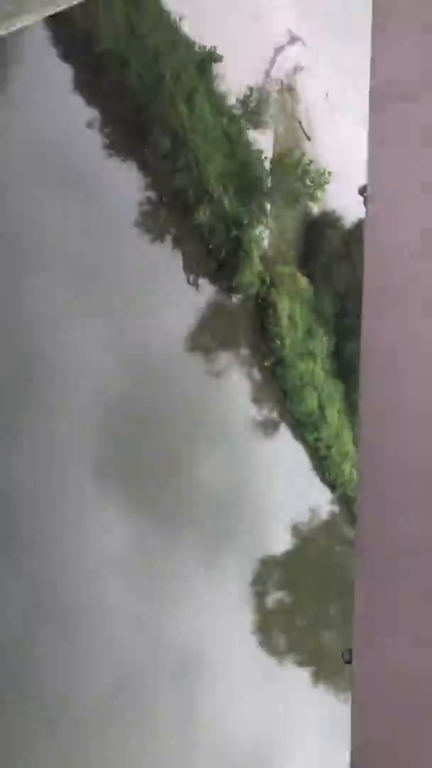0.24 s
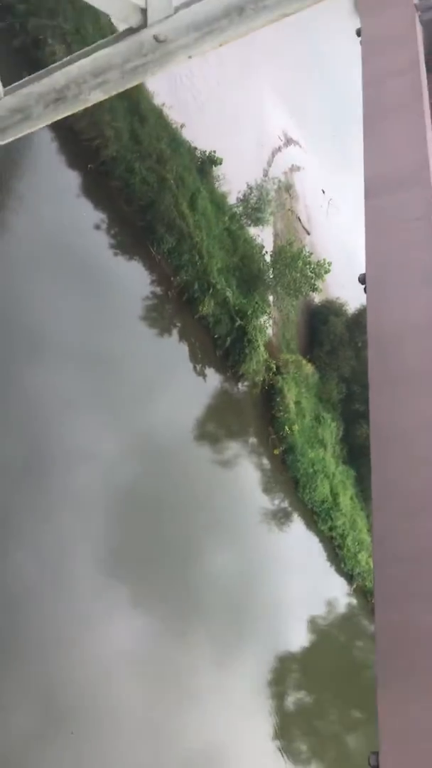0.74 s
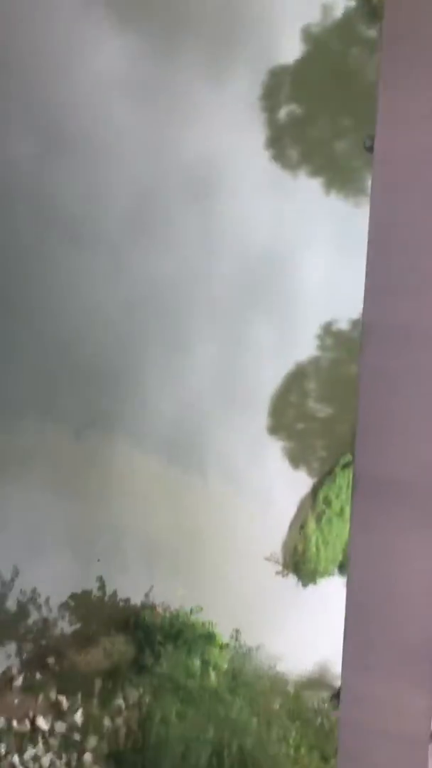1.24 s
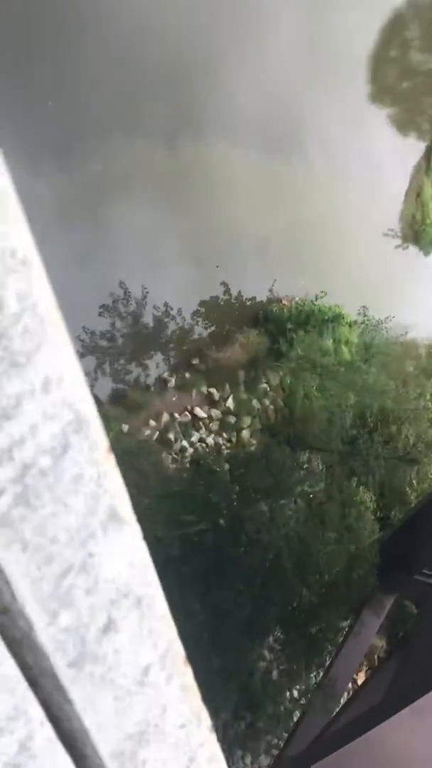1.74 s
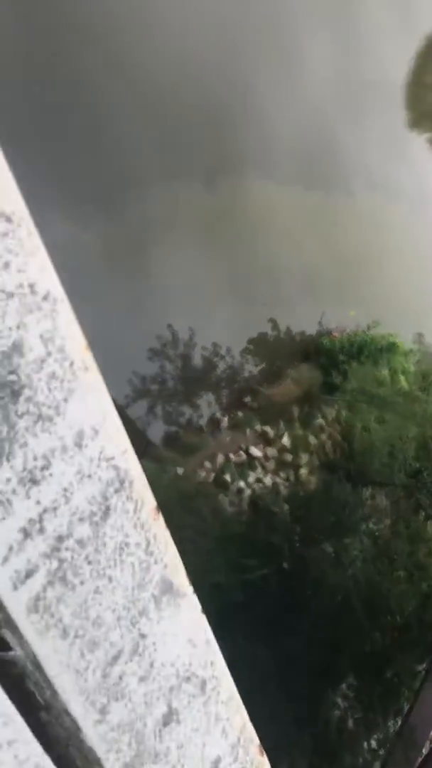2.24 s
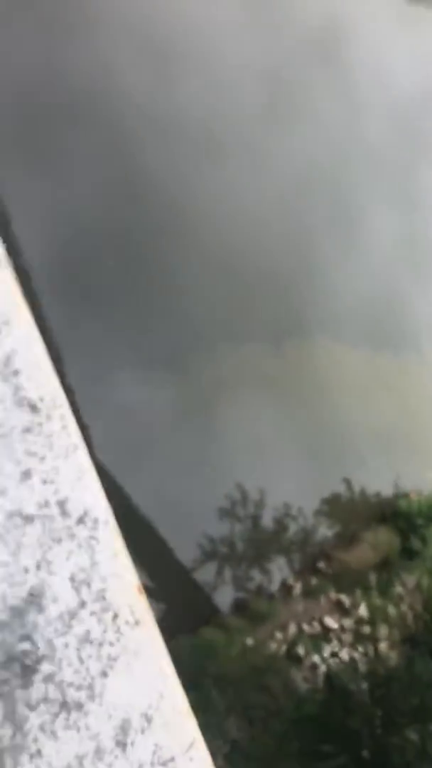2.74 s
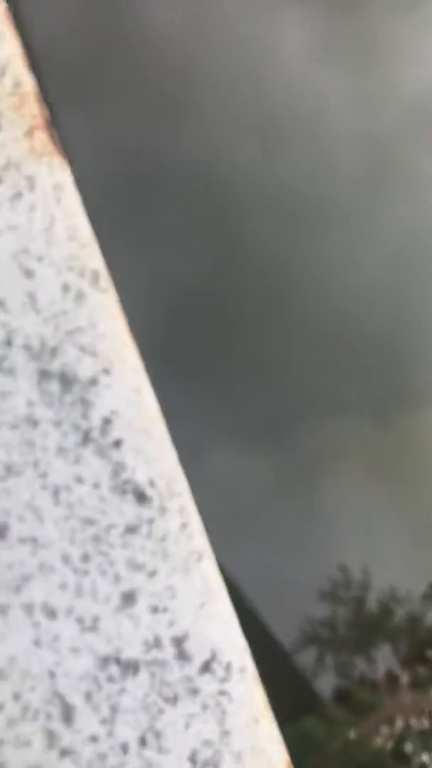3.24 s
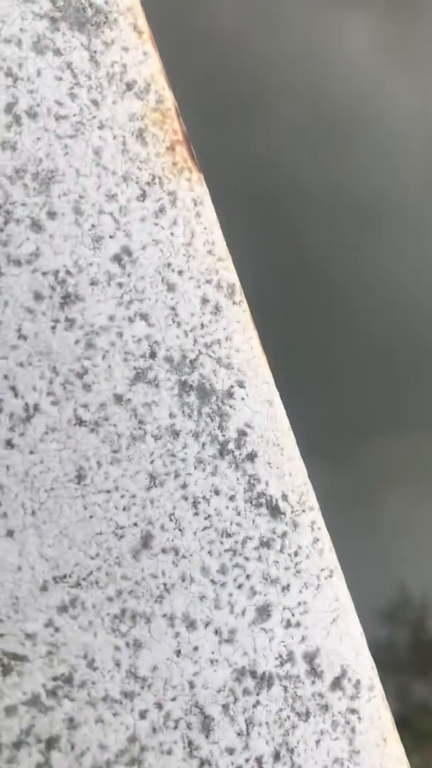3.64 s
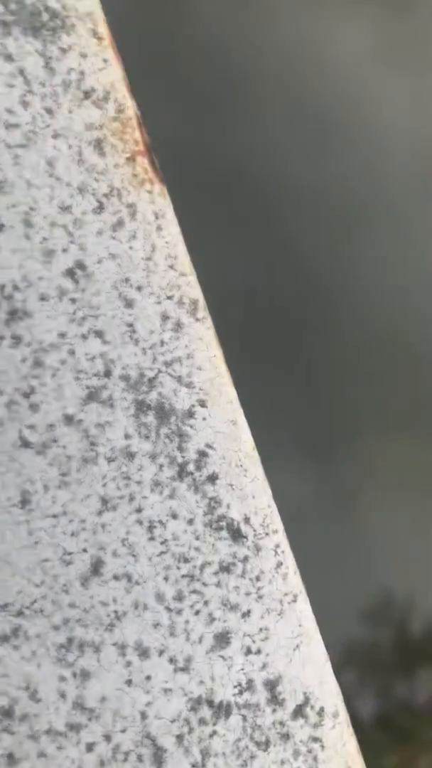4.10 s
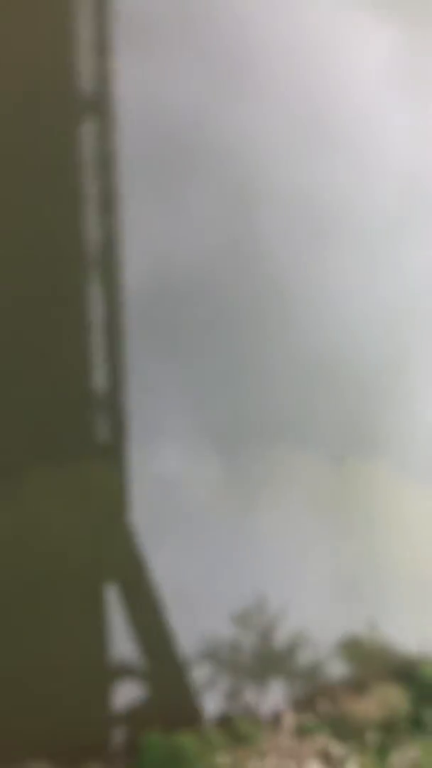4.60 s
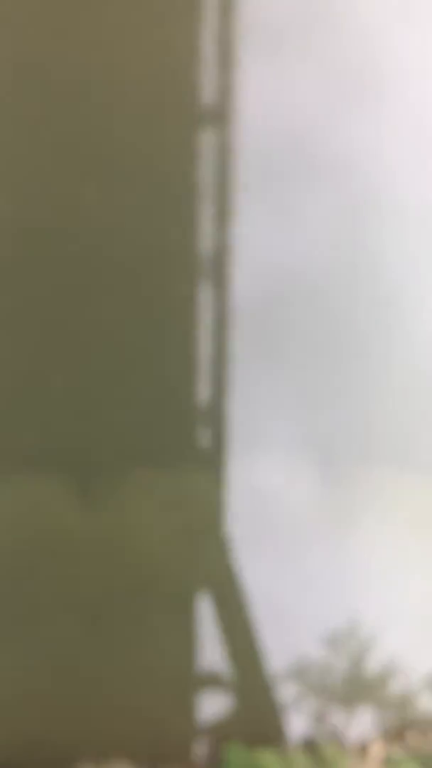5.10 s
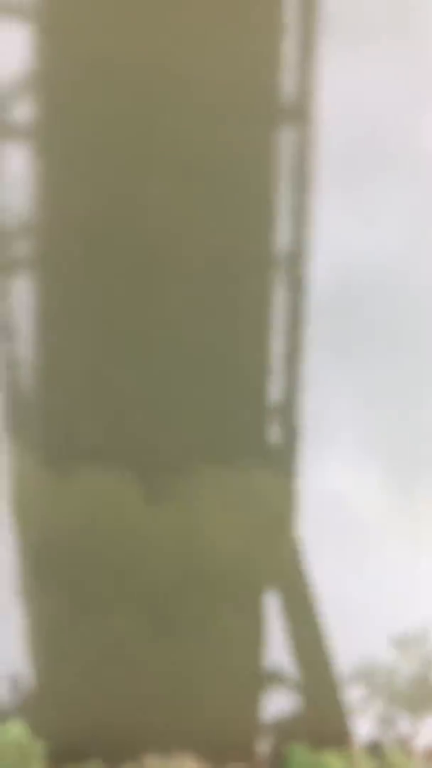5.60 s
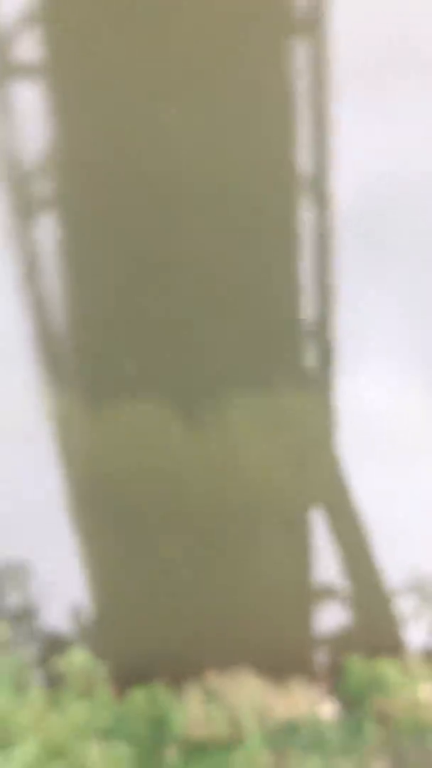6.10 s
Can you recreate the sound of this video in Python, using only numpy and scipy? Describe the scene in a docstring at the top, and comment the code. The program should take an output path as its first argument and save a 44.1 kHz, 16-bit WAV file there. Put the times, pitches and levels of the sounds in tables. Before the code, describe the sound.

Outdoors by a river, traffic on a bridge some way off makes a continuous, uneven tyre rush over a dull drone. One car's tyres sing, a fuzzy whine that slides lower as it passes around the middle. A hard little tick snaps near the microphone, the roar briefly swells, then traffic thins while soft handling bumps knock the device. Low wind rumble, faint hiss and rapid tiny ticking lie beneath.

```python
"""Cars cross a bridge over a river, heard outdoors from some way off.
From the start, coloured noise makes the tyre rush, low drone, wind rumble and hiss; faint ticks run along.
One car's tyres sing in fuzzy bands of noise that sink in pitch as it passes at about 3 s.
Just after, a sharp tick rings close by in fading tones; then the tyre roar swells briefly around 1.2 kHz.
Soft handling bumps, short pulses of a low tone, follow at about 4.4 and 5.3 s as the traffic thins."""
import sys
import numpy as np
from scipy import signal
from scipy.fft import irfft
from scipy.io import wavfile
from scipy.ndimage import uniform_filter1d

SR = 44100
rng = np.random.default_rng(int(sys.argv[2]) if len(sys.argv) > 2 else 0)


def unload_wav(signal):
    """Save mono or channel-first audio to the path in sys.argv[1] as 16-bit WAV at rate SR, clipped to [-1, 1]."""
    wavfile.write(
        sys.argv[1],
        SR,
        np.round(np.clip(np.atleast_2d(signal).T, -1, 1) * 32767).astype(np.int16),
    )


N = 280035  # length in samples, about 6.35 s
FRAME_S = np.arange(N // 256 + 9) * 256 / SR  # times at which the noise spectra may change
BIN_HZ = np.fft.rfftfreq(2048, 1 / SR)  # frequencies at which they are shaped


def from_db(db):
    """Turns decibels into a gain."""
    return 10 ** (np.asarray(db) / 20)


def unit(x):
    """Scales to rms 1."""
    return x / np.sqrt(np.mean(x ** 2) + 1e-20)


def curve(rows, axis=1):
    """Reads one column of a time table at every frame, with straight lines between rows."""
    rows = np.asarray(rows, float)
    return np.interp(FRAME_S, rows[:, 0], rows[:, axis])[:, None]


def colour(points):
    """Turns a colour table into a gain per bin, joined on a log-frequency axis."""
    hz, db = np.transpose(points)
    return from_db(np.interp(np.log(BIN_HZ + 1), np.log(hz), db))


def patches(seconds, span_hz):
    """Random unevenness over time and frequency, rms 1."""
    field = rng.standard_normal((len(FRAME_S), len(BIN_HZ)))
    field = uniform_filter1d(field, max(1, round(seconds / FRAME_S[1])), 0)
    field = uniform_filter1d(field, max(1, round(span_hz / BIN_HZ[1])), 1)
    return unit(field)


def waver(seconds):
    """Slow random changes shared by all frequencies, rms 1."""
    size = max(1, round(seconds / FRAME_S[1]))
    smooth = uniform_filter1d(rng.standard_normal(len(FRAME_S)), size)
    return unit(uniform_filter1d(smooth, size))[:, None]


def hump(hz, width):
    """A resonance with steep skirts, as gain per bin."""
    return (1 + ((BIN_HZ - hz) / width) ** 2) ** -1.5


def noise(shape, level_db):
    """Noise with a moving spectrum: each frame's shape is scaled to rms 1, then set to the level."""
    size = 2 * (len(BIN_HZ) - 1)
    hop = round(FRAME_S[1] * SR)
    white = rng.standard_normal(len(FRAME_S) * hop)
    spectra = signal.stft(white, nperseg=size, noverlap=size - hop)[2].T[:len(FRAME_S)]
    shape_rms = np.sqrt(np.mean(shape ** 2, axis=-1, keepdims=True))
    gain = shape / shape_rms * from_db(level_db)
    return signal.istft((spectra * gain).T, nperseg=size, noverlap=size - hop)[1][:N]


def add(mix, s, sound):
    """Mixes a sound in at a time in seconds."""
    part = mix[round(s * SR):][:len(sound)]
    part += sound[:len(part)]


def tyre_rush(gain_db=1.74, patchy_db=1.1, streak_db=1., surge_db=0.2,
              body_hz=1300, edge_from_hz=1700, edge_full_hz=2300):
    """Air pumped from many treads: its brightness shifts as cars come closer and draw away."""
    # loudness of the traffic, before the gain: t/s, level/dB
    rush_levels = [(0.0, -33), (0.58, -33.8), (0.76, -32), (1.15, -33), (1.7, -33.5), (2.05, -33),
                   (2.38, -33), (2.52, -35), (3.0, -34.5), (3.3, -35), (3.8, -35), (4.4, -37.5),
                   (5.2, -38.5), (5.3, -40.5), (5.8, -41.5), (5.9, -36.5), (6.1, -39), (6.35, -36.5)]
    # basic tone colour: f/Hz, relative level per Hz/dB
    rush_tone = [(300, -19.5), (480, -11.5), (600, -7), (760, -5.5), (880, 0), (1080, -0.5), (1200, -0.5),
                 (1450, 1.5), (1620, -.5), (1850, -5.5), (2100, -12), (3000, -26.5), (4000, -38),
                 (5000, -55), (9000, -82)]
    # changing colour of the passing cars: t/s, tilt of the body/dB per octave, upper edge/dB
    approach = [(0, 0, 3.5), (.75, 0.5, 1), (1.1, 1, 1.5), (2.3, 1.5, -3.5), (2.7, -2.5, 2),
                (3.15, -3, 2.5), (4.2, -2, 3), (5, 2.5, 0.5), (5.65, 0.5, 5), (5.95, -3, -1.5),
                (6.35, 7, -7)]
    body_octaves = np.log2(np.clip(BIN_HZ, body_hz / 2, edge_from_hz) / body_hz)
    upper = np.clip((BIN_HZ - edge_from_hz) / (edge_full_hz - edge_from_hz), 0, 1)
    tilt_db = body_octaves * curve(approach) + upper * curve(approach, axis=2)
    shape = colour(rush_tone) * from_db(tilt_db + midrange_swell())
    # moving air gives short wide patches; shifting reflections give long narrow streaks
    uneven_db = patchy_db * patches(0.065, 300) + streak_db * patches(.4, 90)
    return noise(shape * from_db(uneven_db), curve(rush_levels) + gain_db + surge_db * waver(.04))


def passing(lag_s=0, closest_s=3.05, pass_time_s=1.56):
    """The singing car on a straight road: nearness (1 when closest) and heading (+1 coming, -1 going)."""
    # pass_time_s: how long the car takes to cover its closest distance from the microphone
    along = (closest_s + lag_s - FRAME_S[:, None]) / pass_time_s
    nearness = 1 / (1 + along ** 2)
    heading = along / np.sqrt(1 + along ** 2)
    return nearness, heading


def tyre_song(gain_db=0.5, flutter_db=1.4, octave_ratio=2.04, overtone=5.17, overtone_db=-11, hum_spread=1.25):
    """The tread pattern drums on the road: fuzzy partials that sink together by Doppler shift."""
    # loudness of the whine, before gain and flutter: t/s, level/dB
    whine_levels = [(0, -41.5), (.25, -34), (.95, -38.5), (1.22, -36), (1.65, -46), (2.02, -36),
                    (2.3, -45.5), (2.62, -35), (2.9, -38.5), (3.2, -34.5), (3.8, -42), (4, -46.5),
                    (5.7, -46), (6.35, -51)]
    tread_rate_hz = 318.2  # tread blocks meeting the road
    speed_m_per_s, sound_m_per_s = 20.8, 343
    # band widths: far off, closest, and a part added while coming and taken off while going
    width_far_hz, width_near_hz, width_ahead_hz = 38, 75, 6.5
    hum_far_db, hum_near_db = -52., -43.
    hum_lag_s = 0.45  # the first partial is loudest just behind the car
    octave_db, octave_ahead_db, octave_near_db = -48., 5.5, 5  # the second is thrown forward

    near, heading = passing()
    pitch = tread_rate_hz / (1 - heading * speed_m_per_s / sound_m_per_s)
    width = width_far_hz + (width_near_hz - width_far_hz) * near + width_ahead_hz * heading
    hum_width = hum_spread * width  # the two lowest partials are fuzzier

    hum_near = passing(hum_lag_s)[0]
    hum = noise(hump(pitch, hum_width), hum_far_db + (hum_near_db - hum_far_db) * hum_near)
    octave_level = octave_db + octave_ahead_db * heading + octave_near_db * near
    octave = noise(hump(octave_ratio * pitch, hum_width), octave_level)
    whine_shape = hump(3 * pitch, width) + from_db(overtone_db) * hump(overtone * pitch, width)
    whine = noise(whine_shape, curve(whine_levels) + gain_db + flutter_db * patches(0.096, 80))
    return hum + octave + whine


def drone(gain_db=1.73, patchy_db=1.5, waver_db=0.6):
    """Engines and the bridge deck blend into a dull, uneven drone."""
    # loudness, before the gain: t/s, level/dB
    drone_levels = [(0, -45.5), (.6, -45), (.9, -42.5), (1.8, -42), (2.5, -44.5), (3.7, -45), (5.3, -49),
                    (5.6, -55), (6.35, -46)]
    # tone colour: f/Hz, relative level per Hz/dB
    drone_tone = [(60, -25.5), (110, -6), (165, -0.5), (245, 1.5), (320, -6), (420, -11.5), (520, -14),
                  (800, -41.5), (2000, -67)]
    shape = colour(drone_tone) * from_db(patchy_db * patches(0.45, 45))
    return noise(shape, curve(drone_levels) + gain_db + waver_db * waver(.06))


def rumble(gain_db=-0.45, calm_db=-47.5, calm_fall_db_per_s=0.2):
    """Wind at the microphone: a deep rumble that lifts with each small gust."""
    # gusts, before the gain: t/s, peak level/dB, half length/s
    gusts = [(.31, -48, .07), (.78, -41, .06), (0.953, -38, 0.11), (1.46, -44.5, 0.065), (1.9, -44, .14),
             (2.374, -40, 0.11), (2.575, -36.5, 0.081), (3.016, -41.5, .07), (4.55, -46, .35),
             (6.328, -47, .05)]
    # tone colour: f/Hz, relative level per Hz/dB
    rumble_tone = [(12, -41), (25, -25), (38, -6), (52, 2.5), (85, -1.5), (115, -0.5), (170, -16.5),
                   (400, -36), (1500, -81.5)]
    t = FRAME_S[:, None]
    power = from_db(calm_db - calm_fall_db_per_s * t) ** 2  # the rumble between gusts
    for s, db, half_s in gusts:
        power = power + from_db(db) ** 2 * np.exp(-((t - s) / half_s) ** 2)
    return noise(colour(rumble_tone), 10 * np.log10(power) + gain_db)


def hiss(patchy_db=1.25):
    """A faint, nearly steady hiss, mostly above the traffic in pitch."""
    # loudness: t/s, level/dB
    hiss_levels = [(0, -66), (3.75, -66), (3.95, -64.5), (4.45, -64.5), (4.75, -66), (6.35, -66)]
    # tone colour: f/Hz, relative level per Hz/dB
    hiss_tone = [(1500, -17.5), (3600, -0.5), (4500, -4), (5000, -9.5), (5500, -1), (5900, 3.5),
                 (6400, -4.5), (7000, -8), (7600, -14), (9500, -12.5), (10400, -18.5), (11500, -17),
                 (15700, -17.5)]
    return noise(colour(hiss_tone), curve(hiss_levels) + patchy_db * patches(.03, 2000))


def ticking(level_db=-41.0, spread_db=-1.3, jitter_s=0.00065, burst_s=.0004):
    """Faint electrical ticking: tiny fading noise bursts, almost evenly spaced, through a filter."""
    # one row a train of ticks: start/s, end/s, rate/ticks per s
    trains = [(.0062, 6.35, 20), (3.8728, 4.67, 60)]
    # filter for the bursts: f/Hz, gain/dB
    ticking_tone = [(2500, -11.5), (4500, -1), (5200, -10), (7000, 3.5), (9300, -2.5), (10400, -12),
                    (12500, -6.5), (15700, -9.5)]
    t, out = np.arange(SR // 300) / SR, np.zeros(N)
    times = np.concatenate([np.arange(start, end, 1 / rate) for start, end, rate in trains])
    for s in times:
        late, size, *burst = rng.standard_normal(len(t) + 2)
        burst = burst * np.exp(-t / burst_s)
        gain = from_db(level_db + spread_db * size)
        add(out, max(s + jitter_s * late, 0), gain * burst / np.linalg.norm(burst))
    return signal.oaconvolve(out, np.fft.fftshift(irfft(colour(ticking_tone))), "same")


def tick(gain_db=-4.0, crack_db=-5.0, crack_t60=.008, swell_cycles=1.0, scatter_db=-11.0, scatter_t60=.06):
    """A small hard thing snaps near the microphone; nearby surfaces scatter it briefly."""
    # small hard ticks, the loudest a snap with its rebound, before the gain: t/s, level/dB
    tick_times = [(1.5505, -54), (3.2945, -29.5), (3.2968, -41), (3.8565, -55), (5.9465, -57)]
    # what the tick rings with: f/Hz, level/dB, time to fade by 60 dB/s
    modes = [(1450, 14, 0.018), (2010, 9, 0.017), (2655, 2, 0.024), (3200, 0.5, 0.017), (3630, 2, 0.022),
             (4020, -2, 0.018), (4580, -9.5, 0.023), (5400, -6.5, 0.015), (5920, -7, .012),
             (6770, -2, 0.0077), (7150, -2, 0.011), (8600, -3, 0.0058), (9000, -7.5, 0.0047),
             (9400, -6.5, .014), (11100, -9, .005), (12400, -9, .004), (14300, -13, .004)]
    t = np.arange(SR // 10) / SR
    crack = signal.lfilter([.5], [1, -.5], rng.standard_normal(len(t)))  # softened noise
    snap = crack * from_db(crack_db - 60 * t / crack_t60)
    for hz, db, t60 in modes:
        swell = 1 - np.exp(-(hz * t / swell_cycles) ** 2)  # high modes speak first, the body follows
        ring = np.sin(2 * np.pi * (hz * t + rng.random()))
        snap = snap + swell * from_db(db - 60 * t / t60) * ring
    scatter = rng.standard_normal(len(t)) * from_db(-60 * t / scatter_t60)
    scattered = signal.fftconvolve(snap, scatter / np.linalg.norm(scatter))[:len(t)]
    snap = snap + from_db(scatter_db) * scattered
    out = np.zeros(N)
    for s, db in tick_times:
        add(out, s, from_db(db + gain_db) * snap)
    return out


def midrange_swell(peak_s=3.78, length_s=0.53, centre_hz=1230, width_hz=300, lift_db=6.0):
    """The roar swells around 1.2 kHz for a moment: dB over time and frequency."""
    moment = np.exp(-((FRAME_S[:, None] - peak_s) / length_s) ** 2)
    return lift_db * moment * hump(centre_hz, width_hz)


def bumps(length_s=0.002):
    """The hand shifts on the housing: dull pushes, each a short pulse of a low tone."""
    # soft bumps of the hand: t/s, level/dB, f/Hz
    pushes = [(4.374, -26.5, 330), (4.525, -28, 380), (5.342, -27.5, 400), (5.364, -25.5, 230),
              (5.374, -33, 130), (5.385, -31, 260)]
    t, out = np.arange(-SR // 50, SR // 50) / SR, np.zeros(N)
    for s, db, hz in pushes:
        push = np.exp(-(t / length_s) ** 2) * np.sin(2 * np.pi * hz * t)
        add(out, s + t[0], from_db(db) * push)
    return out


def scene():
    """Traffic, air and the near small sounds in one channel."""
    traffic = tyre_rush() + tyre_song() + drone()
    air = rumble() + hiss()
    small_sounds = ticking() + tick() + bumps()
    return (traffic + air + small_sounds)[None]


def record(dry, low_cut_hz=36, edge_hz=15780):
    """The microphone sheds the deepest bass; then a steep filter removes all above the upper edge."""
    bass_cut = signal.butter(3, low_cut_hz, "highpass", fs=SR, output="sos")
    thinned = signal.sosfilt(bass_cut, dry)
    band_limit = signal.firwin(801, edge_hz, window=("kaiser", 9), fs=SR)
    return signal.oaconvolve(thinned, band_limit[None], "same")


dry = scene()
out = record(dry)
unload_wav(out)
```